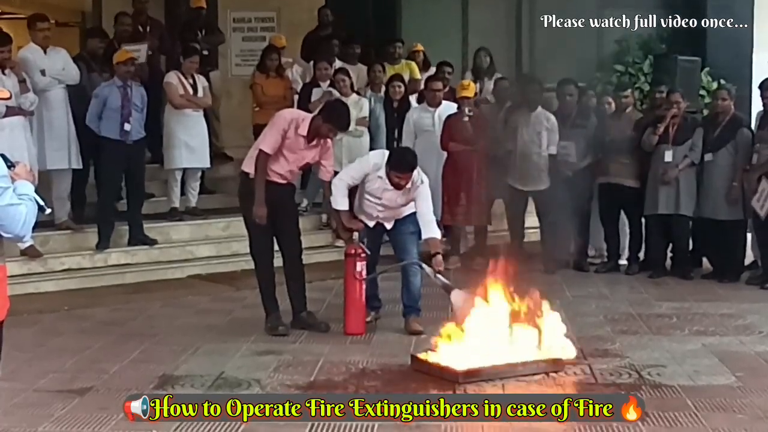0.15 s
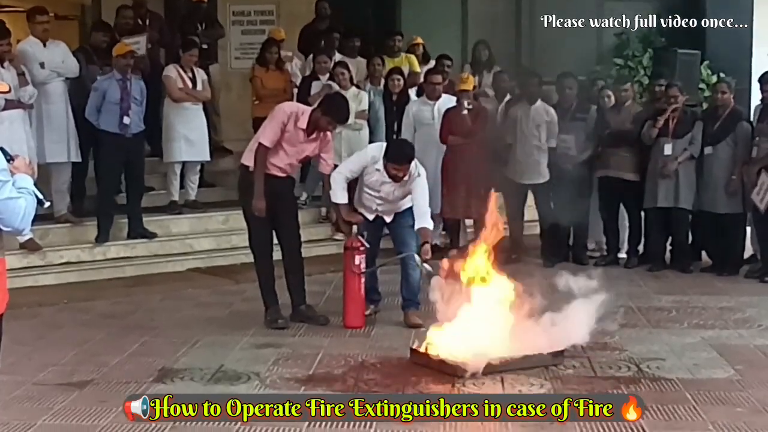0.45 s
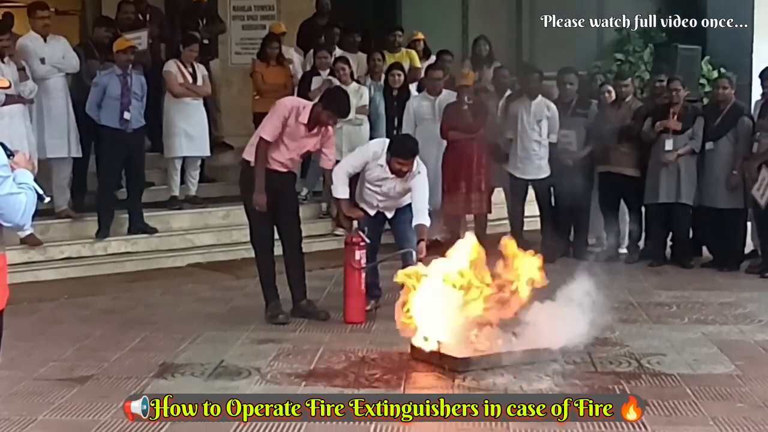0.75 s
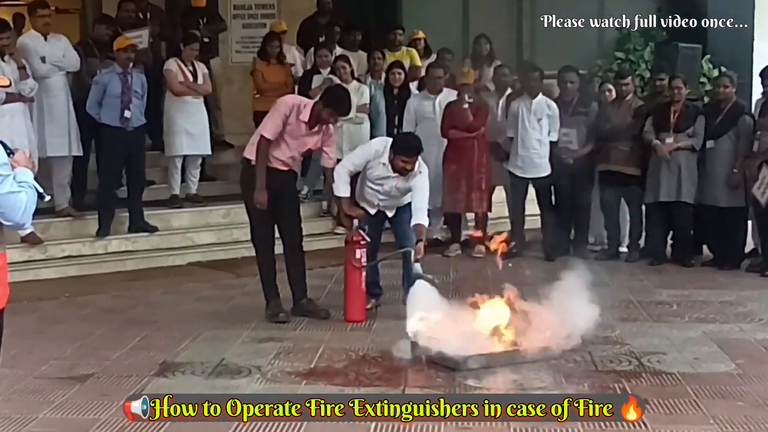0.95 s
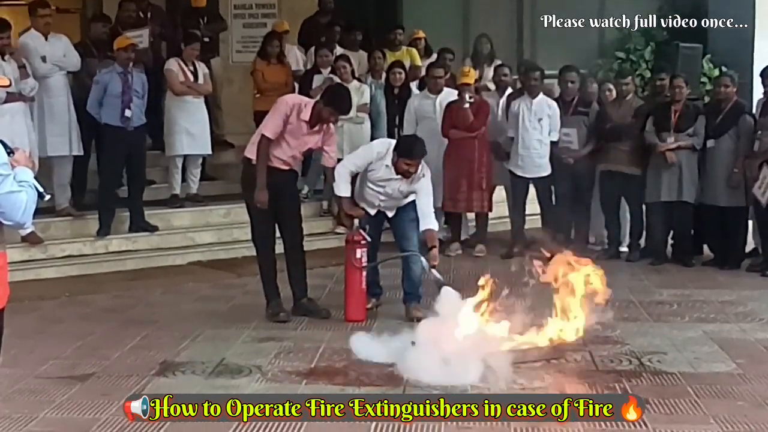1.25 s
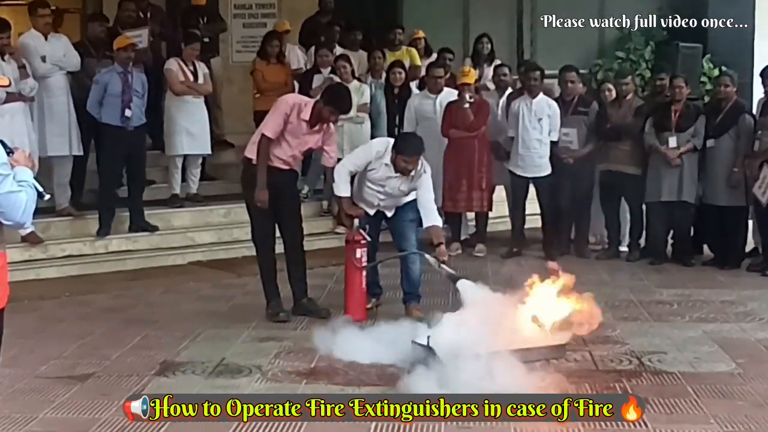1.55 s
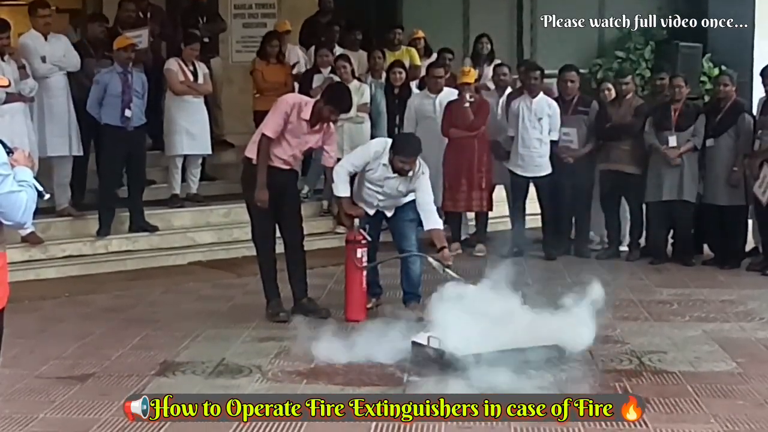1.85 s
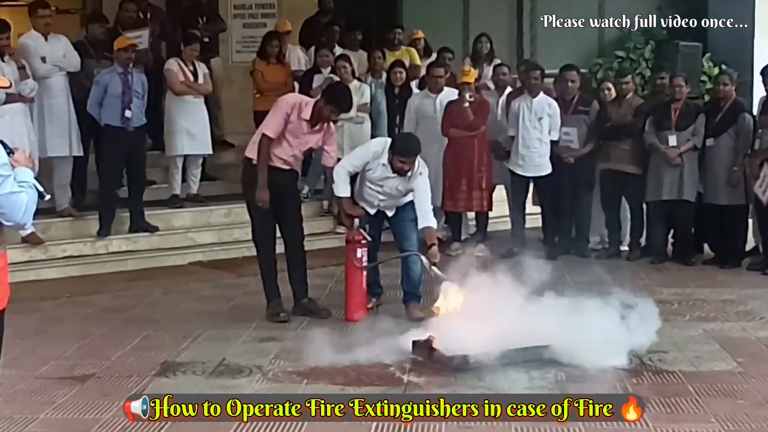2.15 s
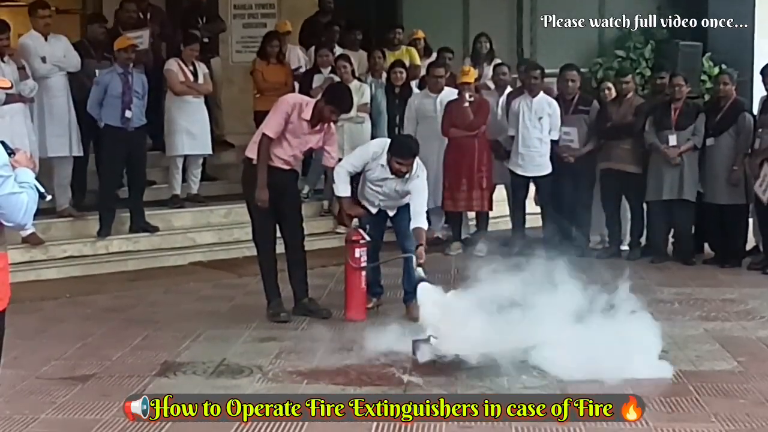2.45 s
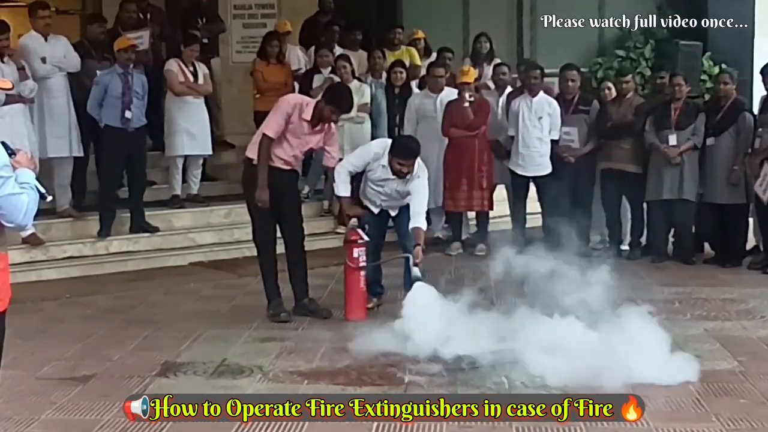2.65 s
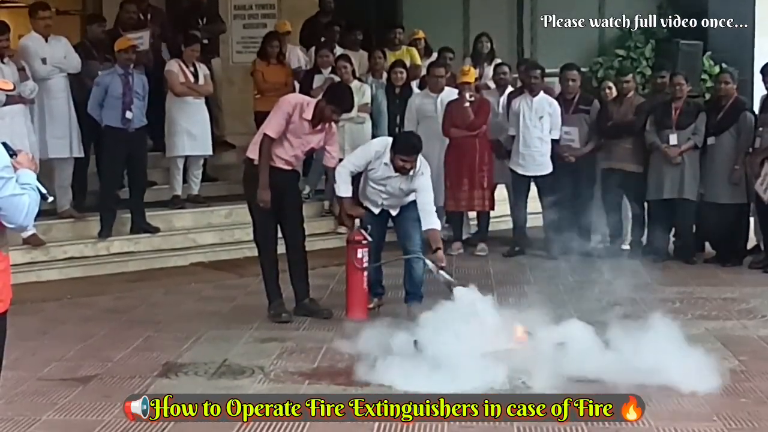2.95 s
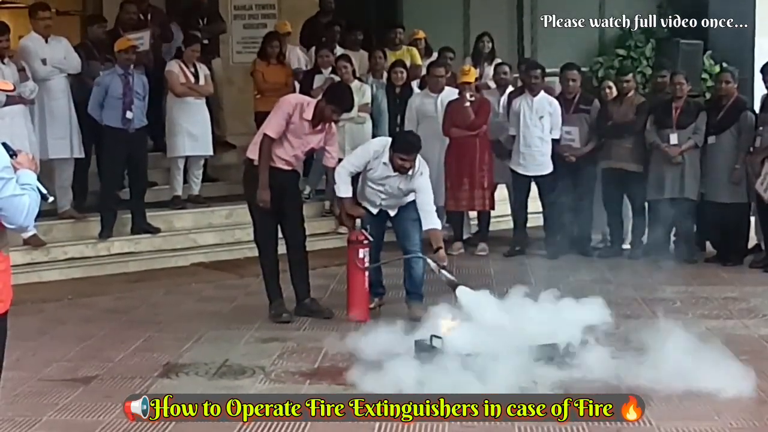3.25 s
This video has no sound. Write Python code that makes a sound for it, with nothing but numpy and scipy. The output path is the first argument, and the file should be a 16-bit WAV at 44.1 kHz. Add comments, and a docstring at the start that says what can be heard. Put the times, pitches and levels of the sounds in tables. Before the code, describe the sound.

A gas fire extinguisher discharges with a loud hiss that soon turns duller and sputters.

```python
"""A gas fire extinguisher empties through its horn onto a burning tray in a paved yard.
It opens with a bright rush of gas and a short low roar. The jet hisses through the horn, whose
resonances (the pitches it rings at) swell in turn as it is swept about. From about half a second the
hiss dulls, brief hollow tones and spits stand out, and a low hollow hum comes and goes.
A phone hears it all through two unlike microphone ports, the left one slightly later."""
import sys
import numpy as np
from scipy import signal
from scipy.fft import rfft, irfft, next_fast_len
from scipy.io import wavfile
from scipy.ndimage import uniform_filter1d, map_coordinates

SR = 44100
rng = np.random.default_rng(int(sys.argv[2]) if len(sys.argv) > 2 else 0)


def to_wav(s):
    """Save 16-bit WAV."""
    ch = np.atleast_2d(s).T  # columns
    pcm = np.round(np.clip(ch, -1, 1) * 32767)  # PCM
    wavfile.write(sys.argv[1], SR, pcm.astype(np.int16))


N = 149940

# How loud the low sounds are over time: time_s, hum_db, roar_db
LOW_LEVELS = [(0.0, -71, -33.5), (0.1, -89.5, -69.5), (0.54, -47.5, -45), (0.75, -43, -52.5),
              (0.83, -49.5, -42.5), (1.16, -52.5, -46), (1.31, -43.5, -44), (1.5, -62, -55),
              (1.68, -48, -58), (1.73, -69, -55.5), (1.86, -43.5, -45), (1.92, -63.5, -50),
              (1.99, -40, -44.5), (2.71, -60.5, -47.5), (3.3, -45.5, -47), (3.4, -51, -55)]


def amp(db):
    """Turn decibels into a number to multiply by."""
    return 10 ** (np.asarray(db) / 20)


def unit(x):
    """Scale a signal to an average power of 1."""
    return x / np.sqrt(np.mean(x ** 2) + 1e-20)


def along(points, hz):
    """Read between (pitch_hz, value) points, with octaves evenly spaced."""
    pitches, values = np.transpose(points)
    return np.interp(np.log(hz + 1), np.log(pitches + 1), values)


def curves(rows):
    """Turn each column after the time into a curve with one value per sample."""
    times, *columns = np.transpose(rows)
    return [np.interp(np.arange(N) / SR, times, column) for column in columns]


def wobble(per_s):
    """A smooth curve through per_s random values a second."""
    points = rng.standard_normal(int(N * per_s / SR) + 4)
    return map_coordinates(points, [np.arange(N) * per_s / SR])


def filtered(x, response):
    """Multiply each frequency in x by response(hz)."""
    size = next_fast_len(N + SR // 4)
    hz = np.fft.rfftfreq(size, 1 / SR)
    return irfft(rfft(x, size) * response(hz), size)[..., :x.shape[-1]]


def resonance(pitch_hz, width_hz):
    """A filter that favours one pitch, like passing twice through a resonance."""
    return lambda hz: (hz * width_hz) ** 2 / ((pitch_hz ** 2 - hz ** 2) ** 2 + (hz * width_hz) ** 2)


def coloured(points):
    """A filter drawn through (pitch_hz, level_db) points, fading to silence beyond them."""
    return lambda hz: amp(along([(1, -90)] + list(points) + [(22000, -90)], hz))


def rush(colour, patchy_db):
    """Rushing noise at the phone's two ports, its level varying in random patches of pitch and time."""
    # How alike the two ports sound: pitch_hz, likeness (1 = the same)
    likeness = [(60, .8), (110, .5), (170, .9), (300, .6), (760, .75), (1250, .15), (1700, .45),
                (2400, .65), (2700, .35), (3300, .75), (4500, .45), (6500, .2), (12000, .35)]
    # How much louder the left port is: pitch_hz, left_minus_right_db
    balance = [(200, 0), (320, 3), (700, 5.5), (1600, 6), (2400, 2.5), (3300, -4), (4000, -5), (5500, 1),
               (8000, -4), (12000, -4), (15000, -9.5)]
    left_lag_s = 41 / SR

    def shared_and_opposite(hz):
        angle = np.arccos(np.clip(along(likeness, hz), -1, 1)) / 2
        return colour(hz) * np.array([np.cos(angle), np.sin(angle)])

    def left_and_right(hz):  # each port takes half of the level gap and half of the lag
        left = amp(along(balance, hz) / 2) * np.exp(-1j * np.pi * hz * left_lag_s)
        return np.array([left, 1 / left])

    spectra = signal.stft(rng.standard_normal((2, N + 1024)), nperseg=512)[2]
    patches = uniform_filter1d(rng.standard_normal(spectra.shape[1:]), size=4, axis=0)  # blur in pitch
    patches = uniform_filter1d(patches, size=8, axis=1)  # blur in time
    noise = signal.istft(spectra * amp(patchy_db * unit(patches)), nperseg=512)[1]
    shared, opposite = filtered(noise, shared_and_opposite)
    ports = filtered(np.array([shared + opposite, shared - opposite]), left_and_right)[:, 512:512 + N]
    return ports / np.sqrt(np.mean(ports.mean(axis=0) ** 2))


def wandering(x):
    """Play a sound at a slowly drifting speed, so its pitch wanders by about 3.5 percent."""
    position = np.arange(N) + np.cumsum(0.035 * wobble(per_s=6))
    return np.array([map_coordinates(port, [position], mode="mirror") for port in x])


def jet():
    """Escaping gas makes a broad hiss: a body, a flickering treble and thin air on top."""
    # The body's loudness: time_s, level_db
    body_levels = [(0.0, -23.5), (0.55, -23.5), (0.8, -29.5), (1.2, -33.5), (2.54, -37), (3.4, -34.5)]
    # The highs hold through the first rush, then drop: time_s, treble_db, air_db
    high_levels = [(0, -30, -56), (.08, -27, -45), (.17, -29, -57), (.3, -36, -61), (.49, -42.5, -63),
                   (.515, -47, -69.5), (1.2, -59, -73.5), (2, -50.5, -68.5), (3.4, -50, -70)]
    # The tone colour of each part: pitch_hz, level_db
    body_colour = [(500, -14), (620, -1.5), (1000, -1), (1400, -6.5), (2700, 0), (4600, -4.5), (6500, -26),
                   (8000, -42)]
    treble_colour = [(4800, -13.5), (6200, 0), (8200, -11), (10000, -17), (11500, -30), (13500, -41.5)]
    air_colour = [(11000, -18), (13800, -9.5), (14400, -2), (15800, 0)]
    body_db, = curves(body_levels)
    treble_db, air_db = curves(high_levels)
    flicker_db = 1.5 * wobble(22)
    body = amp(body_db + 0.58 * wobble(16)) * rush(coloured(body_colour), patchy_db=1.5)
    treble = amp(treble_db + flicker_db) * rush(coloured(treble_colour), patchy_db=1.2)
    air = amp(air_db + 0.6 * flicker_db + 1.1 * wobble(12)) * rush(coloured(air_colour), patchy_db=-0.5)
    return body + treble + air


def low_roar():
    """A weak roar under the hiss, loudest at the very start."""
    # The roar's tone colour: pitch_hz, level_db
    roar_colour = [(100, -37.5), (220, -0.5), (290, -8), (420, -4), (510, -12), (700, -2)]
    _, roar_db = curves(LOW_LEVELS)
    return amp(roar_db + 0.33 * wobble(9.26)) * rush(coloured(roar_colour), patchy_db=4.5)


def horn():
    """The gas rings the horn; each resonance swells with the sweep, wanders and sputters on its own."""
    # The horn's resonances: pitch_hz, width_hz, sputter_db
    resonances = [(753, 165, -3.3), (1589, 625, -0.3), (2278, 1100, 1.03), (3255, 1440, 1), (3913, 510, 1),
                  (5440, 1300, 2)]
    # Their loudness as the horn is swept about: time_s, then one level_db for each resonance
    sweep = [(0.0, -28, -26.5, -28, -33, -25.5, -34), (0.13, -71.5, -29.5, -27.5, -28, -24.5, -31),
             (0.4, -33, -23, -32.5, -29.5, -28.5, -34.5), (0.62, -40, -25.5, -30, -40.5, -35, -38.5),
             (0.8, -48.5, -30.5, -26.5, -32, -31.5, -45.5), (0.96, -44.5, -29, -31.5, -26.5, -27, -50.5),
             (1.079, -48, -30.5, -27.5, -27.5, -30.5, -45), (1.46, -42, -29.5, -34, -25.5, -29, -48.5),
             (1.73, -69, -27, -30.5, -26, -32.5, -41.5), (1.92, -58, -27.5, -30.5, -28.5, -37, -60.5),
             (2.37, -47, -28, -29, -32.5, -32.5, -45.5), (2.58, -37, -30, -28, -31, -30, -46),
             (2.66, -39, -33.5, -23, -35.5, -28, -72), (2.84, -56, -34, -33, -24, -24, -55),
             (2.92, -36, -31.5, -32.5, -29, -29.5, -45), (3.35, -50.5, -28.5, -28, -30.5, -34, -46),
             (3.4, -50, -30, -28, -34.5, -35, -59)]
    falloff_hz = 6850  # the resonances fall away above this
    out = np.zeros((2, N))
    for (pitch_hz, width_hz, sputter_db), level_db in zip(resonances, curves(sweep)):
        colour = lambda hz: resonance(pitch_hz, width_hz)(hz) / (1 + (hz / falloff_hz) ** 4)
        loudness = amp(level_db + sputter_db * wobble(16))
        out += loudness * wandering(rush(colour, patchy_db=0.36))
    return out


def tones_and_spits():
    """Narrow bands of the hiss swell and fade for a moment."""
    # One hollow tone or spit a row: middle_s, length_s, pitch_hz, width_hz, level_db
    bursts = [(0.478, .03, 5600, 1510, -31.5), (0.524, 0.13, 1521, 40, -27.5),
              (0.715, 0.15, 1780, 298, -25.5), (0.794, 0.12, 2397, 200, -34), (0.946, 0.17, 787, 25, -35),
              (1.017, 0.14, 5130, 905, -40), (1.01, 0.092, 3070, 700, -25),
              (1.102, 0.037, 3180, 750, -21.5), (1.149, 0.17, 1191, 30, -34),
              (1.347, 0.058, 3080, 600, -27.5), (1.486, 0.073, 3270, 750, -21),
              (1.609, 0.19, 3130, 800, -23.5), (1.656, 0.022, 5420, 500, -35.5),
              (1.736, 0.096, 3040, 600, -24), (1.803, 0.044, 5730, 500, -37),
              (2.212, 0.092, 1403, 40, -29.5), (2.566, 0.053, 768, 90, -31),
              (2.693, 0.084, 5500, 900, -39.5), (2.724, 0.02, 4200, 500, -25.5),
              (2.775, 0.03, 4050, 600, -25), (2.855, 0.035, 4450, 900, -24.5),
              (2.957, 0.032, 3160, 450, -25.5), (3.24, 0.068, 5170, 800, -42),
              (3.318, 0.039, 5450, 450, -37)]
    noise = rush(np.ones_like, patchy_db=0)
    out = np.zeros((2, N))
    for middle_s, length_s, pitch_hz, width_hz, level_db in bursts:
        size = round(1.2 * length_s * SR)  # a fifth longer, to allow for the fades
        start = round(middle_s * SR) - size // 2
        colour = resonance(pitch_hz, width_hz)(np.fft.rfftfreq(size, 1 / SR)) ** 2
        band = irfft(rfft(noise[:, start:start + size]) * colour, size)
        swell = np.sqrt(2 * np.hanning(size))
        out[:, start:start + size] += amp(level_db) * swell * unit(band)
    return out


def hum_and_rumble():
    """A narrow band of noise makes a hollow hum; a faint rumble rises and falls with it."""
    # The rumble's tone colour: pitch_hz, level_db
    rumble_colour = [(25, -19), (65, -5.5), (110, -0.5), (140, -16)]
    hum_db, _ = curves(LOW_LEVELS)
    hum = amp(hum_db + 0.4 * wobble(14)) * rush(resonance(pitch_hz=162.7, width_hz=41), patchy_db=4.5)
    rumble_db = -61 + 0.38 * (hum_db - hum_db.mean())
    return hum + amp(rumble_db) * rush(coloured(rumble_colour), patchy_db=-1.5)


def noise_suppressor(x):
    """The phone turns down whatever does not stand above the average power around it."""
    share_removed, deepest_cut_db = 0.53, -8
    spectra = signal.stft(x, nperseg=2048, noverlap=1536)[2]
    power = uniform_filter1d(np.mean(np.abs(spectra) ** 2, axis=0), size=3, axis=1) + 1e-20
    steady = uniform_filter1d(power, size=30, axis=1)  # average over time
    steady = uniform_filter1d(steady, size=9, axis=0)  # and over nearby pitches
    power_kept = np.clip(1 - share_removed * np.abs(steady / power), amp(deepest_cut_db) ** 2, 1)
    return signal.istft(spectra * np.sqrt(power_kept), nperseg=2048, noverlap=1536)[1][:, :N]


def scene():
    """All the sounds of the extinguisher added together, left and right."""
    return jet() + low_roar() + horn() + tones_and_spits() + hum_and_rumble()


def record(dry):
    """The phone turns down steady noise, makes up the level and drops the very highest pitches."""
    boost_db, top_hz = 2.5, 15750
    return filtered(amp(boost_db) * noise_suppressor(dry), lambda hz: hz < top_hz)


dry = scene()
out = record(dry)
to_wav(out)
```